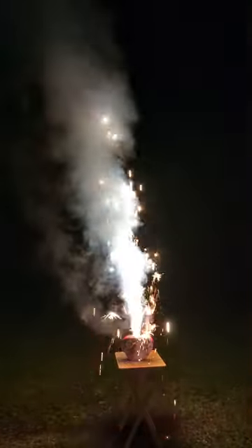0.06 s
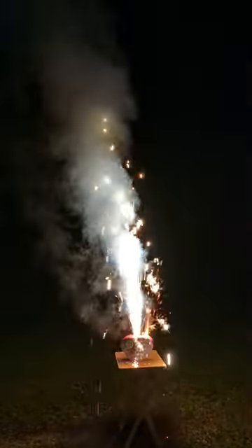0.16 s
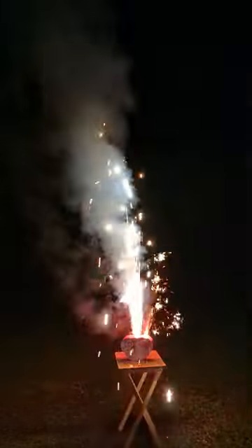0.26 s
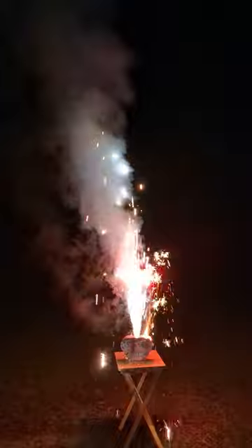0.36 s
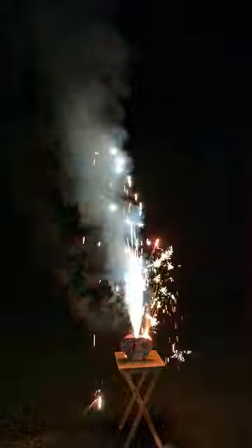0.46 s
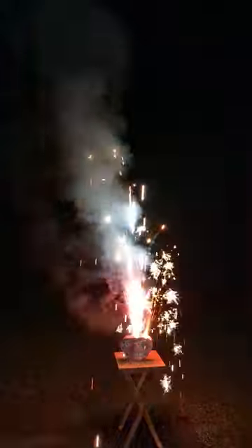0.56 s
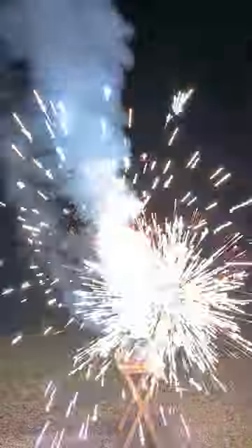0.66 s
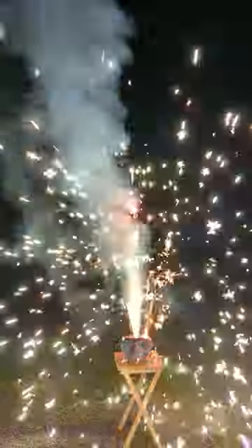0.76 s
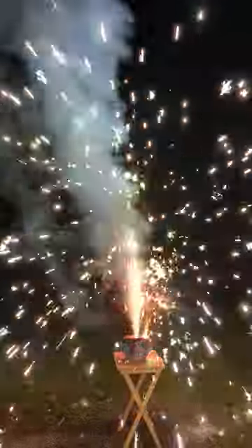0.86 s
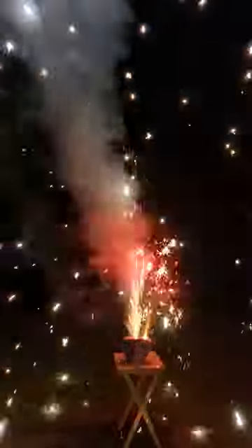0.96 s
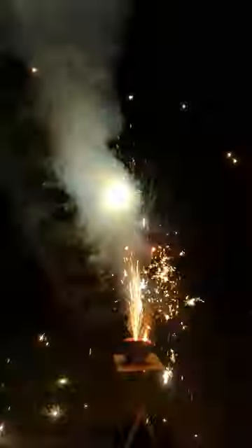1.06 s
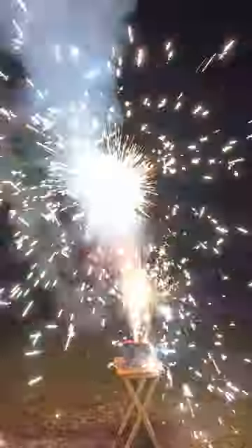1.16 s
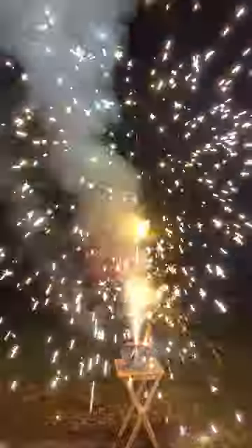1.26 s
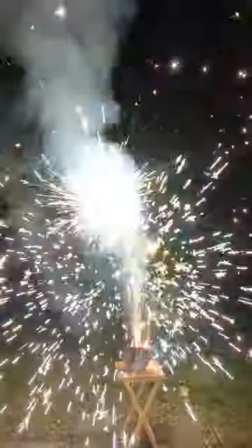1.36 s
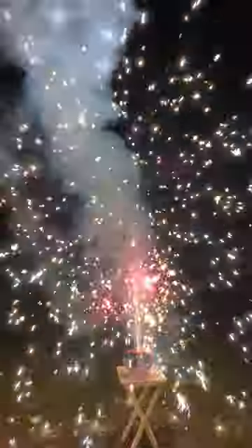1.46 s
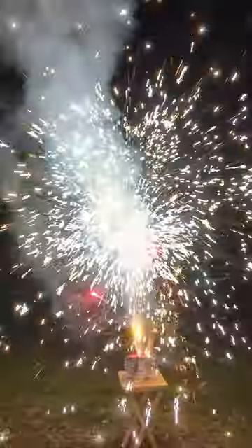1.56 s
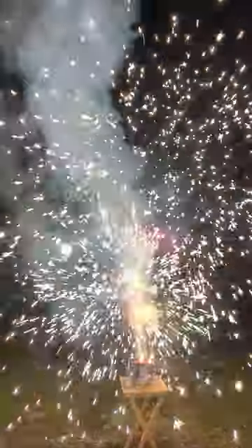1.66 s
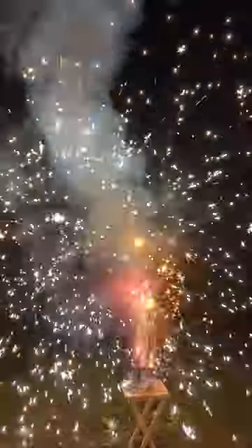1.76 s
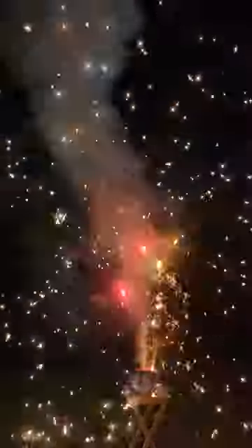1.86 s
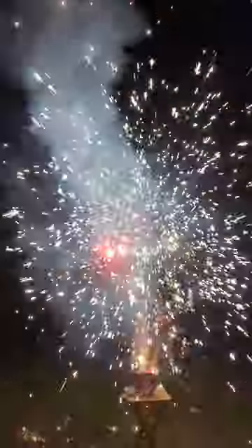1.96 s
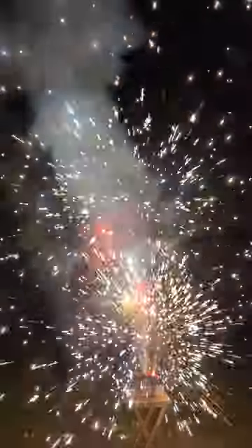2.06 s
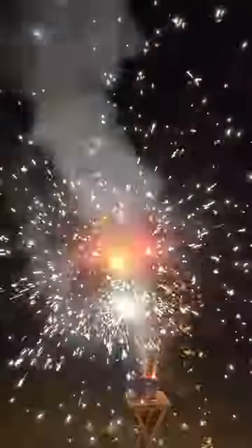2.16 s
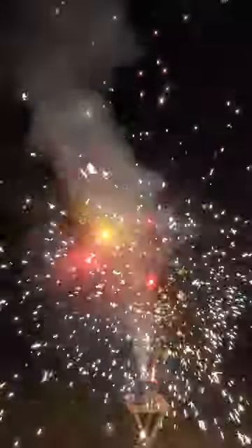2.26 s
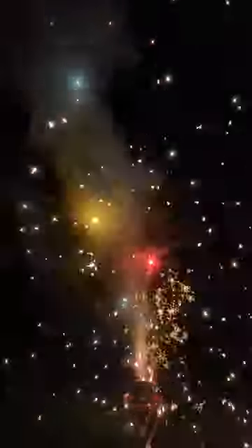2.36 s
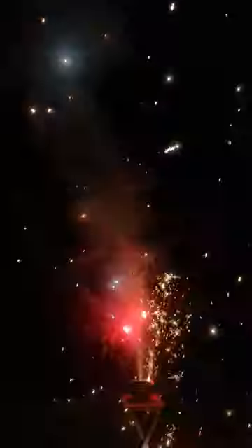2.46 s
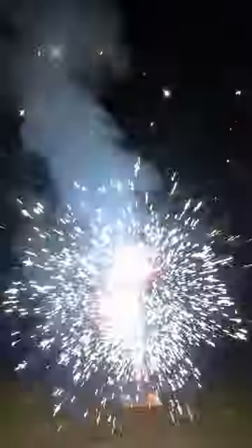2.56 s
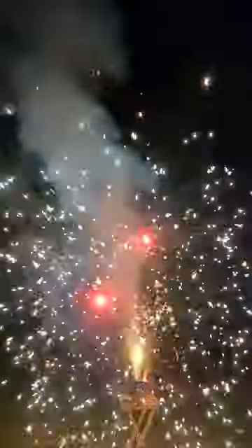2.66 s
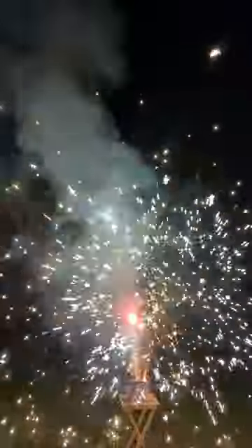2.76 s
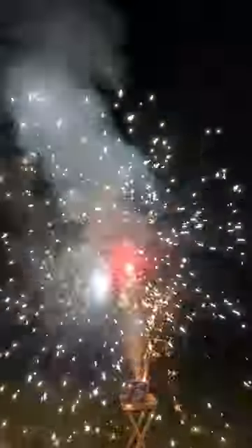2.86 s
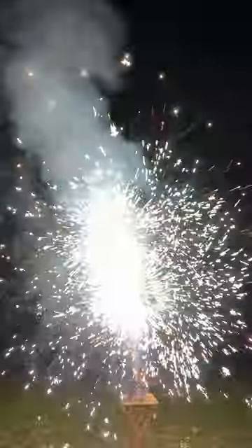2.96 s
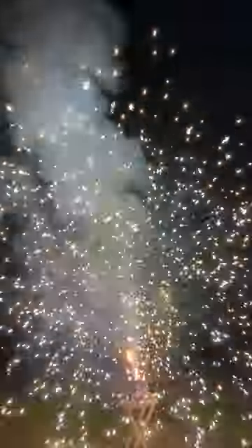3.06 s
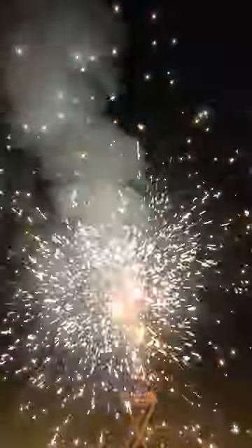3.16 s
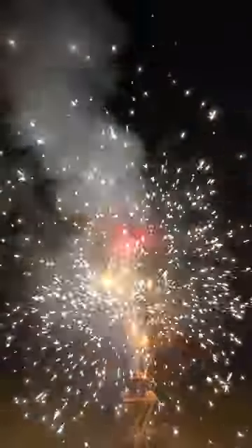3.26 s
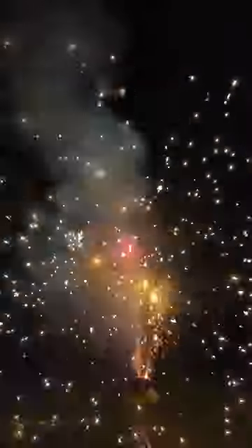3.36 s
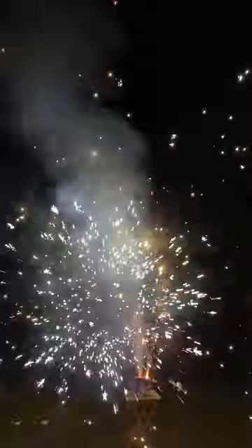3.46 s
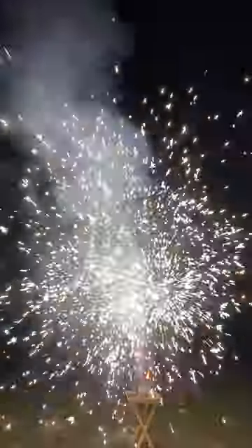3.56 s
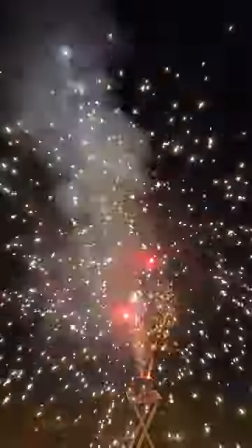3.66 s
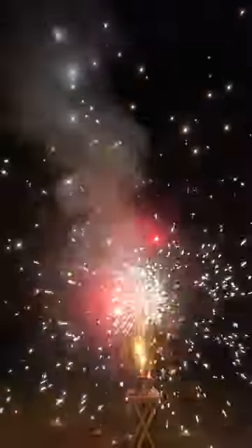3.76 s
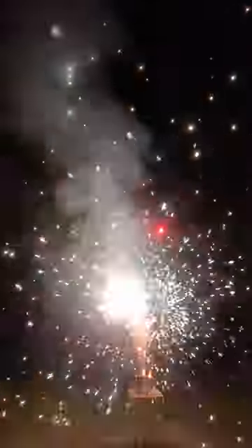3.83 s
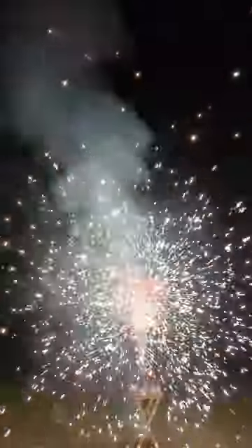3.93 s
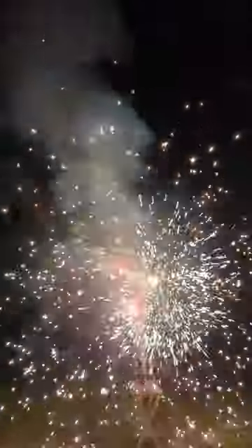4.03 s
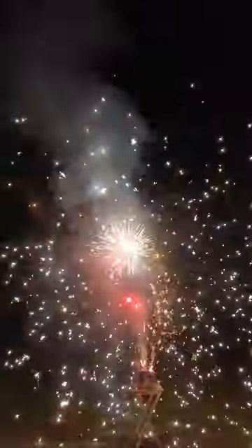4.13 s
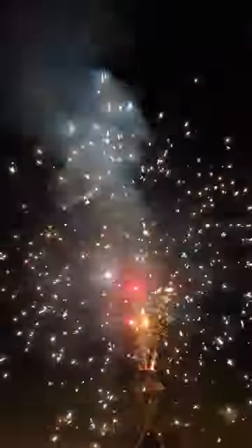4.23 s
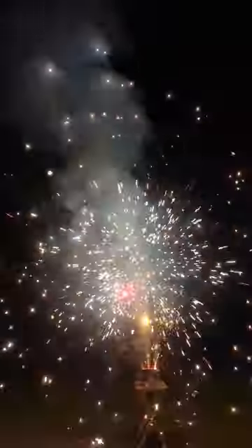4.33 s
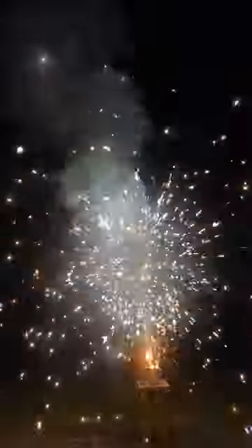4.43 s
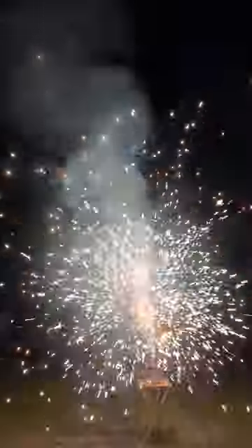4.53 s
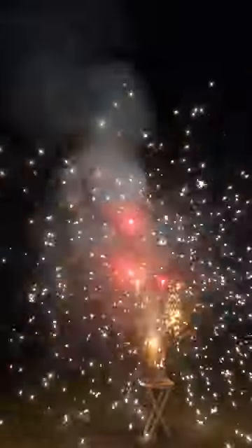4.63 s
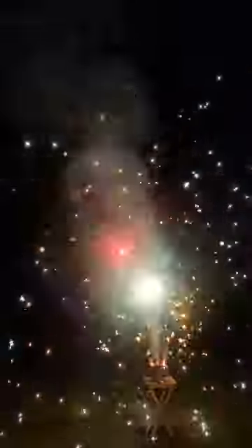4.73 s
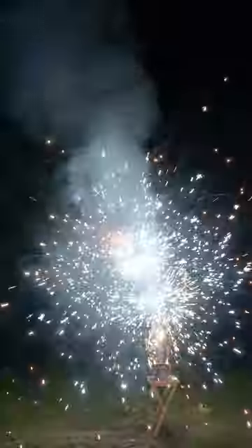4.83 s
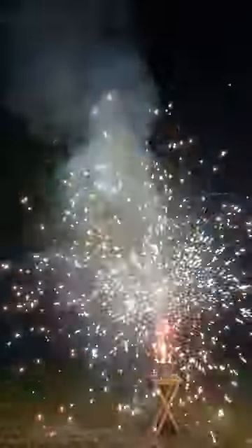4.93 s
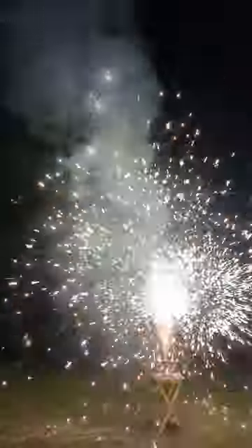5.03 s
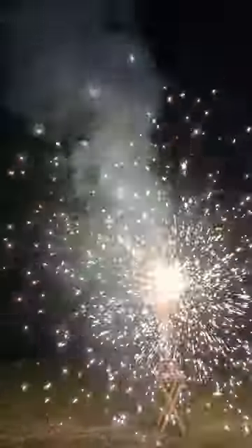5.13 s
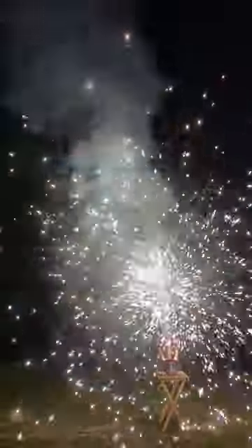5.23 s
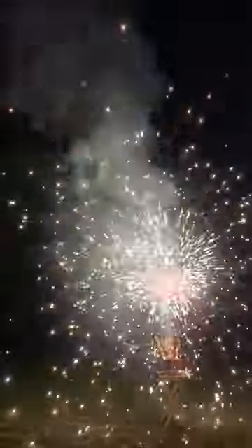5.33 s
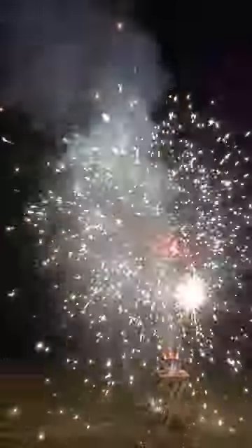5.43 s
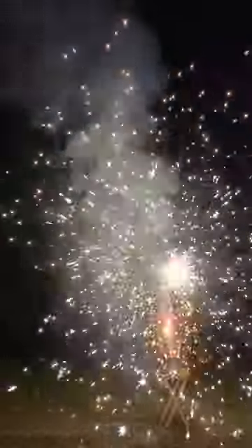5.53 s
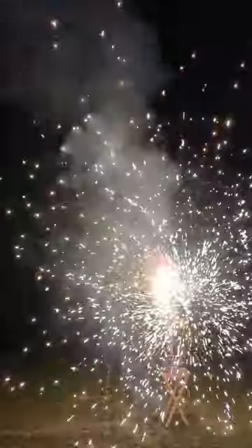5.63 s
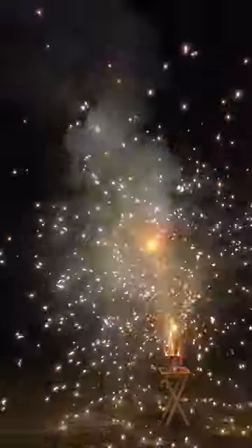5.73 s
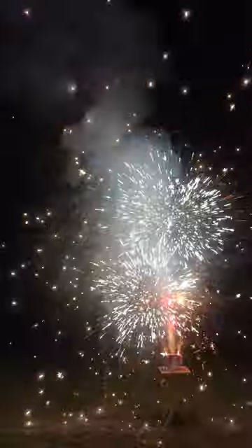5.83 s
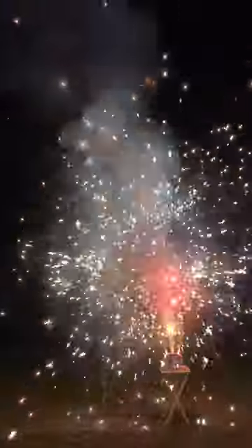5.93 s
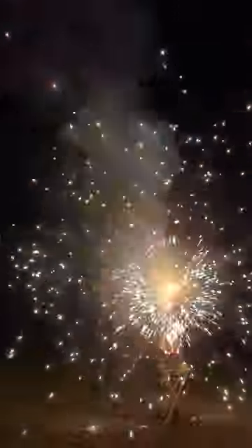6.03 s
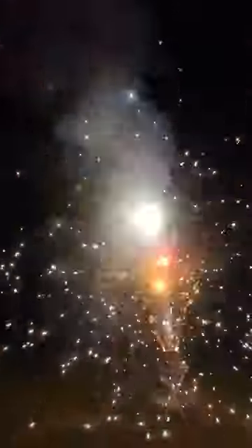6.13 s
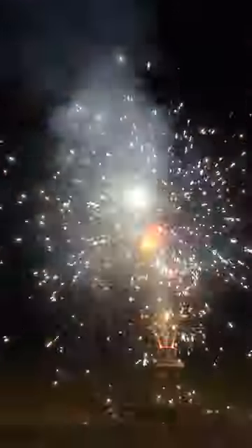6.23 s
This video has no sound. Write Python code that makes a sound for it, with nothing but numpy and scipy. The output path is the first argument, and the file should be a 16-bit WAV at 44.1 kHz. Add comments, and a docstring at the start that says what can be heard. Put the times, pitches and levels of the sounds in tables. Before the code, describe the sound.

A fountain firework on a lawn hisses softly and gives two faint spits. After about half a second it starts throwing stars that burst with sharp cracks in a fast, uneven run, each leaving a bright sizzle of tiny popping sparks. The crackle stays dense to the end. The microphone is a few metres away in the open air, and the hardest blasts give it low thumps on the left.

```python
"""A fountain firework on a lawn at night, a few metres from the microphones.
First gas hisses softly out of the cardboard tube and spits twice. From about 0.6 s it throws up stars:
each bursts with a crack, bounces off the ground and leaves a sizzling swarm of tiny popping sparks.
As the stars keep coming, a fast limiter ducks the sizzle around the cracks,
and the hardest blasts thump the left microphone."""
import sys
import numpy as np
from scipy import signal
from scipy.fft import rfft, irfft
from scipy.io import wavfile
from scipy.ndimage import uniform_filter1d, minimum_filter1d

SR = 44100
rng = np.random.default_rng(int(sys.argv[2]) if len(sys.argv) > 2 else 0)


def master(y):
    """Save y as 16-bit WAV."""
    cut = np.clip(np.atleast_2d(y).T, -1, 1)
    pcm = np.round(cut * 32767)  # scale
    wavfile.write(sys.argv[1], SR, pcm.astype(np.int16))


N = 277389
TIME = np.arange(N) / SR

# cue list of bursting stars: t/s, relative blast strength/dB, relative spark swarm level/dB
STARS = [(0.647, -28, -28.5), (0.685, -31.5, -25.5), (0.836, -33, -23.5), (1.121, -34, -35),
         (1.141, -28, -23), (1.209, -17, -26.5), (1.35, -33, -27), (1.405, -42, -32.5), (1.422, -34, -23),
         (1.551, -35, -32), (1.577, -31, -28), (1.597, -29.5, -22.5), (1.641, -29, -22),
         (1.689, -31.5, -32), (1.729, -20, -27), (1.938, -37, -27), (1.964, -34, -27.5),
         (2.086, -32, -22.5), (2.165, -27.5, -25), (2.218, -14, -25), (2.25, -43, -29), (2.563, -32, -33.5),
         (2.582, -33, -27.5), (2.604, -37, -26.5), (2.764, -31, -25.5), (2.834, -13, -24.5),
         (2.93, -15.5, -30), (2.937, -15, -27), (2.981, -35, -24), (2.999, -40, -28), (3.009, -35, -23.5),
         (3.171, -43, -33), (3.178, -30.5, -24.5), (3.195, -34.5, -22), (3.251, -39, -25.5),
         (3.284, -39.5, -30), (3.46, -39, -31.5), (3.531, -34, -32), (3.558, -35, -22), (3.605, -33, -28),
         (3.754, -36.5, -26.5), (3.812, -39, -30), (3.864, -38, -37), (3.892, -29.5, -31),
         (3.907, -34, -22.5), (3.97, -27.5, -22.5), (4.052, -29, -22.5), (4.183, -35.5, -27.5),
         (4.298, -42, -37), (4.35, -43, -24.5), (4.445, -38, -26), (4.53, -37, -24.5), (4.55, -35.5, -24.5),
         (4.793, -29, -28.5), (4.824, -16.5, -31.5), (4.873, -36, -28), (4.922, -40, -29.5),
         (5.015, -43.5, -36.5), (5.03, -40, -30), (5.048, -33, -23.5), (5.08, -50, -35),
         (5.152, -34.5, -25), (5.184, -36, -26.5), (5.242, -39, -34.5), (5.267, -38, -30.5),
         (5.366, -23.5, -26.5), (5.405, -18, -27), (5.486, -36, -26), (5.532, -43, -32.5),
         (5.582, -43, -32), (5.625, -33, -25), (5.66, -29, -29), (5.857, -46, -28.5), (5.867, -36, -27),
         (5.901, -23.5, -30), (6.064, -31, -26), (6.191, -15, -24), (6.238, -42, -28.5)]
# tone of popping sparks: f/Hz, level/dB
SIZZLE = [(60, -30), (160, -15), (260, -18.5), (450, -14.5), (900, -4.5), (1400, -3), (2700, -0.5),
          (5000, -1), (9000, 2), (16000, -5.5)]


def crack(body_db, gain_db=2, drive=1.21, snap_s=0.00022, grit_db=-3, push_s=0.00047, bounce_s=0.0023,
          ear_lag_s=0.00038, spray_s=0.00045, spray_db=-9, tail_s=0.0082, tail_db=-23, echo_db=-5):
    """A star bursts: a snap and its blast wave, then their ground bounce and a scatter from the grass."""
    # tone of the snap: f/Hz, level/dB
    snap_tone = [(100, -8.5), (600, 0), (1500, -0.5), (3000, -2.5), (5000, -5), (9000, -7), (16000, -5)]
    t = TIME[:1300]
    grit, rough, scatter = rng.standard_normal((3, 2, len(t)))
    snap = colour((t == 0) + amp(grit_db) * grit * (t > 0) * np.exp(-t / snap_s), snap_tone)
    snap /= abs(snap).max(1, keepdims=True)
    wave = amp(body_db) * blast(t, push_s * amp(2.2 * rng.standard_normal()), soft_hz=1700)
    direct = (snap + wave) * amp([[0], [-2.5]])  # stars burst a little to the left
    direct[1] = np.interp(t - 0.0002 * rng.random(), t, direct[1], left=0)
    # the bounce reaches the right ear first
    late = t - bounce_s * rng.uniform(0.76, 1.15) - np.array([[ear_lag_s], [0]])
    age = np.maximum(late, 0)
    spray = amp(spray_db) * rough * np.exp(-age / spray_s)
    tail = amp(tail_db) * scatter * np.exp(-age / tail_s)
    grass = colour((spray + tail) * (late >= 0), snap_tone) * amp([[0], [5]])
    echo = amp(echo_db) * np.interp(late, t, wave, left=0)
    return amp(gain_db) * np.tanh(drive * (direct + grass + echo)) / np.sqrt(drive)  # sharp tips saturate


def blast(t, push_s, soft_hz):
    """Blast wave: a short overpressure, then a longer suction."""
    age = np.maximum(t, 0) / push_s
    return lowpass((t >= 0) * (1 - age) * np.exp(-age), soft_hz)


def swarms(rise_s=0.0017, fall_db_per_s=102, sparks_db=0.47, lean_db=1.06,
           wash_rise_s=0.045, wash_fall_db_per_s=66, wash_hz=2600):
    """Each star scatters grains that pop ever more faintly; the yard adds a duller, later, longer wash."""
    sparks, wash_power = np.zeros((2, 2, N))
    t = TIME[:2 ** 15]
    for s, _, swarm_db in STARS:
        bounce_s = rng.uniform(0.001396, 0.0035)  # every star bursts at its own height
        grains = unit(lawn_bounce(pops(len(t), per_s=10000, spread_db=3.5), bounce_s))
        add(sparks, s, grains * (1 - np.exp(-t / rise_s)) * amp(swarm_db - fall_db_per_s * t))
        swell = (1 - np.exp(-t / wash_rise_s)) * amp(swarm_db - wash_fall_db_per_s * t)
        add(wash_power, s, swell[None] ** 2)
    wash = lowpass(np.sqrt(wash_power) * pops(N, per_s=2500, spread_db=3), wash_hz)
    return colour(amp(sparks_db) * sparks + wash, SIZZLE) * amp([[-lean_db], [lean_db]])


def pops(samples, per_s, spread_db):
    """Random tiny explosions of uneven size, different in each ear."""
    size = amp(spread_db * np.minimum(rng.exponential(1, (2, samples)), 4))
    polarity = rng.choice([-1, 1], (2, samples))
    fires = rng.random((2, samples)) < per_s / SR
    return unit(size * polarity * fires)


def lawn_bounce(x, delay_s, strength=0.37, soft_hz=14000):
    """Adds the bounce off the lawn, which hollows the sound like a comb; grass swallows its treble."""
    hz = np.fft.rfftfreq(x.shape[1], 1 / SR)
    bounce = strength * np.exp(-2j * np.pi * hz * delay_s) / (1 + hz / soft_hz)
    return irfft(rfft(x) * (1 + bounce), x.shape[1])


def thumps(overload_db=-31.5, push_s=0.0012, soft_hz=1300, lag_s=0.00041, bounce_s=0.003, bounce_db=-15,
           shove_db=18.5, swing_db=-15, right_db=-32, nudge_db=-11):
    """Every blast nudges the bass; its excess over the overload level shoves the left mic; a few boom."""
    # deep booms under the blasts: t/s, level/dB, nominal length/s, right relative to left/dB
    booms = [(.647, -15.5, .039, -1), (.835, -38, .049, -9), (1.142, -22, .038, -2),
             (1.208, -10, 0.047, -30), (1.64, -29, .05, -4), (3.971, -34, 0.032, -10),
             (4.183, -33, .03, -16)]
    t, out = TIME[:SR // 10], np.zeros((2, N))
    push = blast(t - lag_s, push_s, soft_hz)
    push += amp(bounce_db) * blast(t - lag_s - bounce_s, push_s, soft_hz)
    shove = amp(shove_db) * (push + amp(swing_db) * swing(t, length_s=0.035)) * amp([[0], [right_db]])
    nudge = amp(nudge_db) * swing(t, length_s=0.019, swing_hz=85)
    for s, strength_db, _ in STARS:
        clean = amp(min(strength_db, overload_db))
        excess = amp(strength_db) - clean
        add(out, s, clean * nudge + excess * shove)
    for s, db, length_s, boom_right_db in booms:
        add(out, s, amp(db) * swing(t, length_s) * amp([[0], [boom_right_db]]))
    return out


def swing(t, length_s, swing_hz=53, decay_s=0.032, stretch=1.4, sag_turns=0.064):
    """The microphone's bass swings for a few cycles after a shove."""
    turns = swing_hz * t - sag_turns * np.exp(-t / 0.00097)  # the first swing is the quickest
    attack = 1 - np.exp(-t / 0.0014)
    fade = np.cos(np.pi / 2 * np.minimum(t / (stretch * length_s), 1))
    return -np.cos(2 * np.pi * turns) * attack * np.exp(-t / decay_s) * fade


def jet(crossfeed=0.86, crossfeed_hz=1500, spit_s=0.015, spit_hz=4000):
    """The hiss bed: sputtering gas rushes out of the cardboard tube and spits before the first star."""
    # broad tone of the gas: f/Hz, level/dB
    gas_tone = [(25, -17), (70, -4.5), (150, -2), (300, -1.5), (520, 3.5), (1100, -3), (1700, -7),
                (2700, -10), (5000, -13.5), (12000, -18.5), (16000, -19)]
    # tube resonances, and hollows from the ground bounce: f/Hz, width/Hz, lift/dB
    tube = [(240, 120, -11.5), (520, 160, -1), (743, 92, -6), (1143, 96, 5), (1290, 77, -5),
            (1395, 89, 13.5), (1954, 59, 5), (2700, 200, -2), (3520, 320, 5)]
    # level ride of the rush: t/s, rms level/dB
    ride = [(0, -51.5), (.2, -51), (.45, -49.7), (.63, -47.3), (1.1, -46.5), (2.5, -51), (6.3, -50)]
    # faint spits: t/s, starting level/dB
    spits = [(.055, -50), (.272, -49)]
    hz = np.fft.rfftfreq(N, 1 / SR)
    tube_db = sum(db / (1 + (2 * (hz - f) / width) ** 2) for f, width, db in tube)
    gas = rfft(pops(N, per_s=7000, spread_db=3))
    gas = gas + crossfeed / (1 + (hz / crossfeed_hz) ** 2) * gas[::-1]  # long waves reach both ears alike
    rush = unit(irfft(gas * amp(curve_db(gas_tone, hz) + tube_db), N))
    rush *= amp(np.interp(TIME, *np.transpose(ride)))
    t = TIME[:SR // 10]
    for s, db in spits:
        sizzle = colour(pops(len(t), per_s=3500, spread_db=2), SIZZLE)
        add(rush, s, amp(db) * unit(lowpass(sizzle, spit_hz)) * np.exp(-t / spit_s))
    return rush


def limiter(x, ceiling_db=-11.5, release_db_per_s=360, ahead_s=0.0065, smooth_s=0.0024):
    """Look-ahead peak limiter: dives just before a crack and climbs back within some 40 ms."""
    over_db = np.maximum(20 * np.log10(abs(x).max(0) + 1e-9) - ceiling_db, 0)
    duck_db = -minimum_filter1d(-over_db, 2 * round(ahead_s * SR) + 1)
    climb = release_db_per_s * TIME
    held_db = np.maximum.accumulate(duck_db + climb) - climb
    return x * amp(-uniform_filter1d(held_db, round(smooth_s * SR)))


def colour(x, points, size=2048):
    """Minimum-phase EQ, so that clicks keep their sharp front."""
    hz = abs(np.fft.fftfreq(size, 1 / SR))
    log_gain = np.log(amp(curve_db(points, hz)))
    taps = np.fft.ifft(np.exp(np.conj(signal.hilbert(log_gain)))).real
    return signal.oaconvolve(x, taps[None], axes=1)[:, :x.shape[1]]


def curve_db(points, hz):
    """Reads an EQ curve on a log-frequency axis."""
    f, db = np.transpose(points)
    return np.interp(np.log(hz + 1), np.log(f + 1), db)


def lowpass(x, hz):
    """Gentle two-pole low-pass."""
    return signal.sosfilt(signal.butter(2, hz, fs=SR, output="sos"), x)


def amp(db):
    """Decibels to gain."""
    return 10 ** (np.asarray(db) / 20)


def unit(x):
    """Scales to rms 1."""
    return x / np.sqrt(np.mean(x ** 2) + 1e-20)


def add(mix, s, sound):
    """Mixes a sound in at time s."""
    part = mix[:, round(s * SR):][:, :sound.shape[1]]
    part += sound[:, :part.shape[1]]


def scene(body_lift_db=25.5, body_max_db=-7.5):
    """Jet, swarms and cracks in the open air; stronger stars get more body, up to a limit."""
    air = jet() + swarms()
    for s, strength_db, _ in STARS:
        add(air, s, crack(body_db=min(strength_db + body_lift_db, body_max_db)))
    return air


def record(dry, edge_hz=16000):
    """The microphone chain: port colour, limiter, thumps, soft clip and band limit."""
    # treble colour of the microphone ports: f/Hz, level/dB
    port_tone = [(5500, 0.5), (6700, 3.5), (8200, 1), (9500, 5), (12000, 6.5), (13200, 2), (14000, -4),
                 (14800, -1), (16000, -2.5)]
    x = limiter(colour(dry, port_tone)) + thumps()
    x = x / (1 + (x / 0.85) ** 6) ** (1 / 6)  # rounds the tips of the thumps
    high_cut = signal.firwin(401, edge_hz, window=("kaiser", 8), fs=SR)
    return signal.oaconvolve(x, high_cut[None], "same", axes=1)


dry = scene()
out = record(dry)
master(out)
```